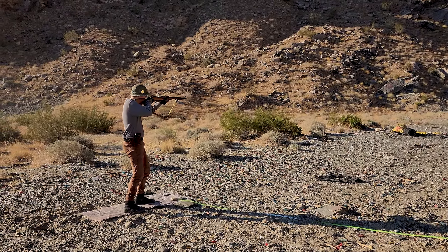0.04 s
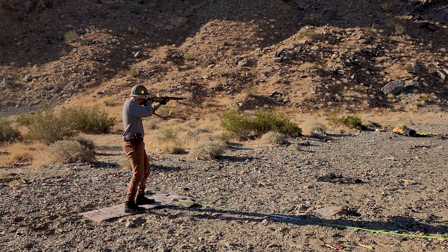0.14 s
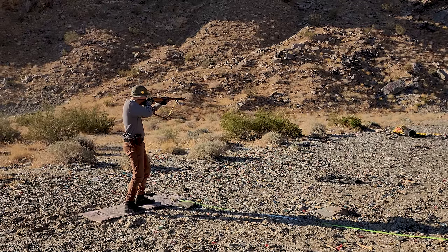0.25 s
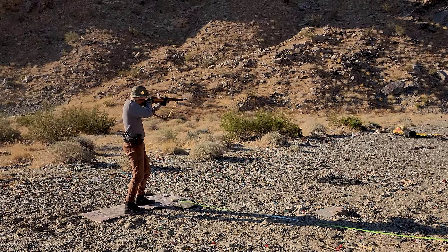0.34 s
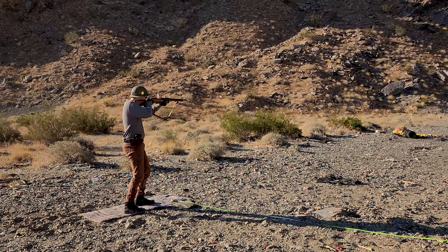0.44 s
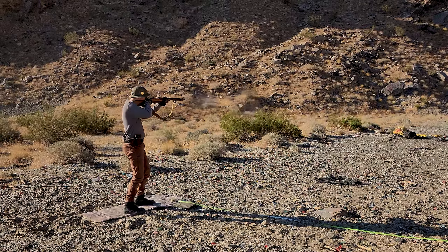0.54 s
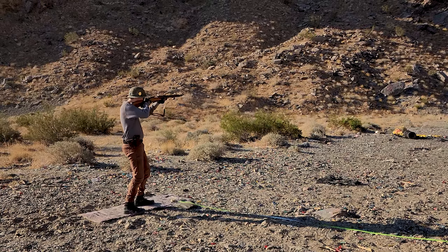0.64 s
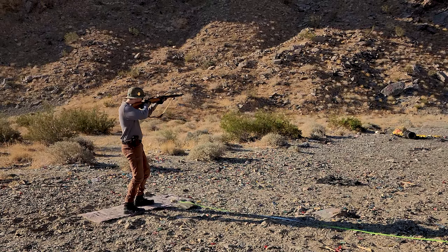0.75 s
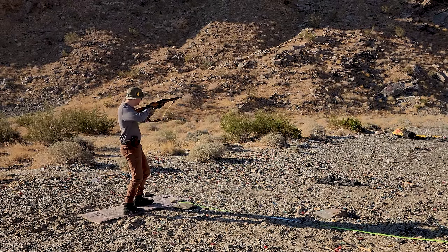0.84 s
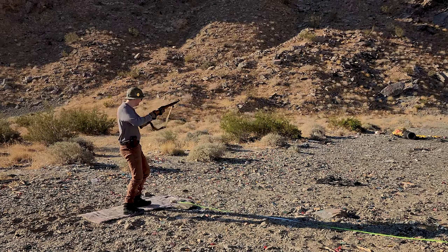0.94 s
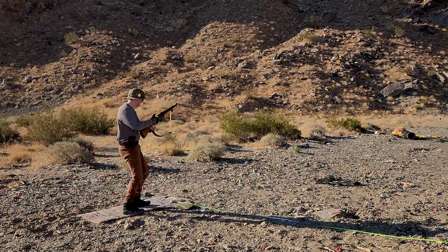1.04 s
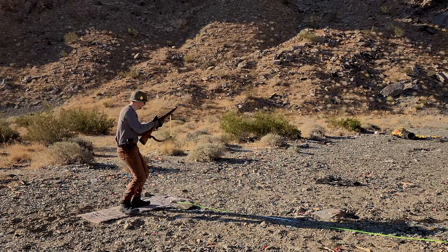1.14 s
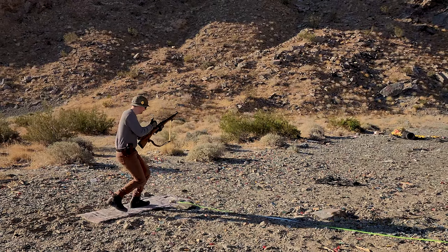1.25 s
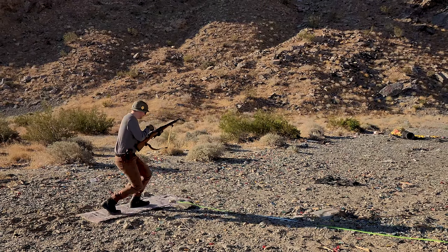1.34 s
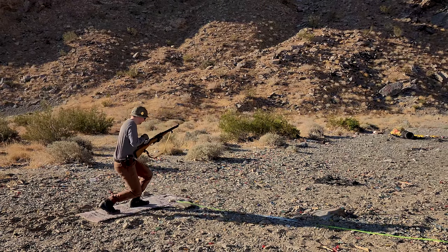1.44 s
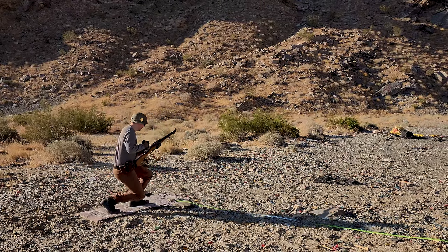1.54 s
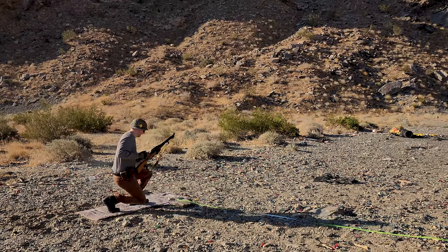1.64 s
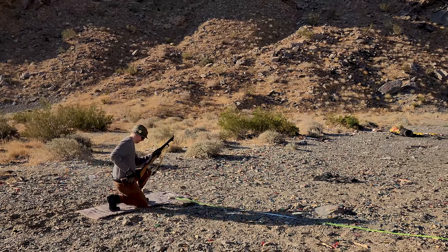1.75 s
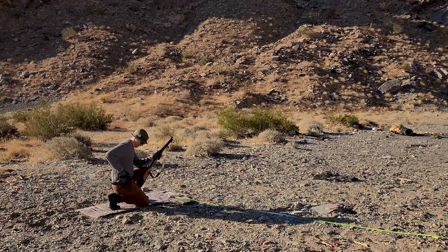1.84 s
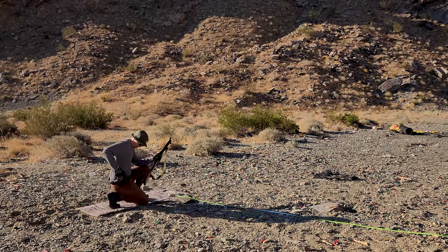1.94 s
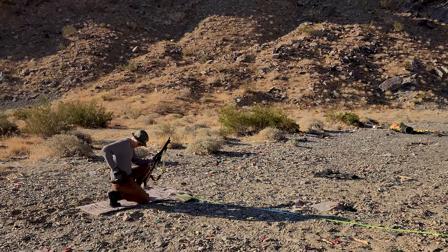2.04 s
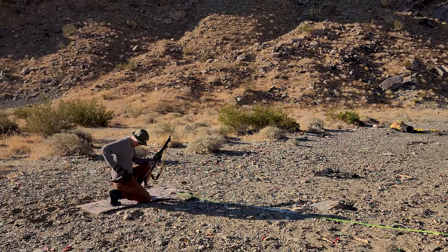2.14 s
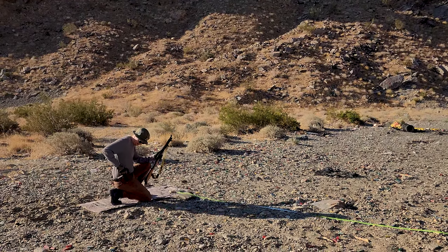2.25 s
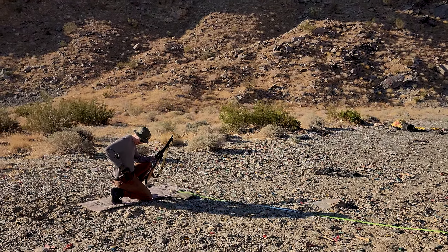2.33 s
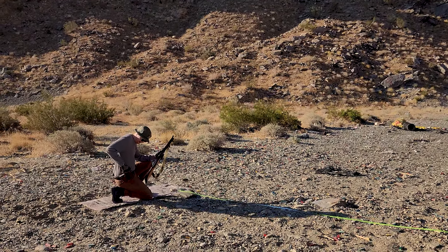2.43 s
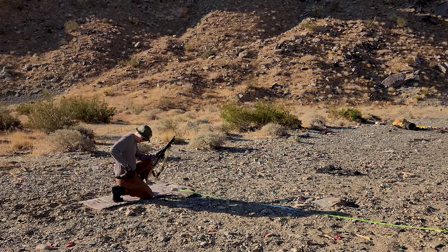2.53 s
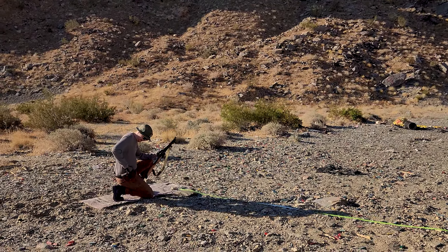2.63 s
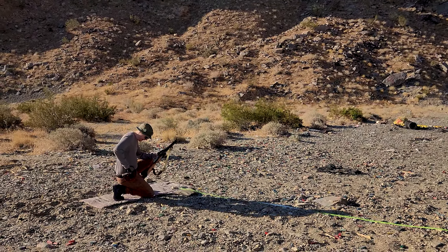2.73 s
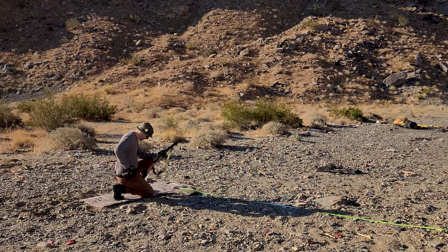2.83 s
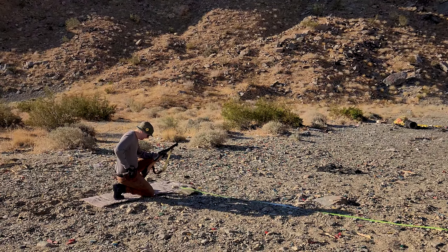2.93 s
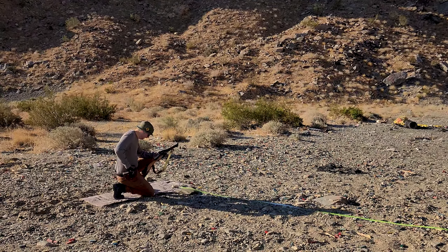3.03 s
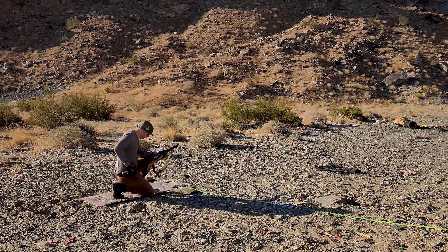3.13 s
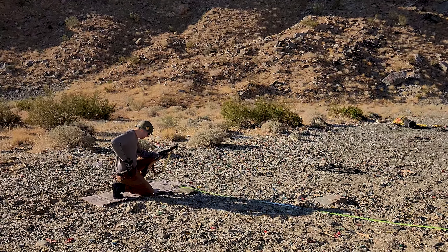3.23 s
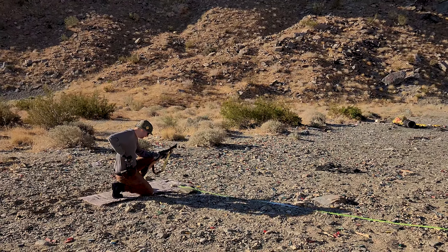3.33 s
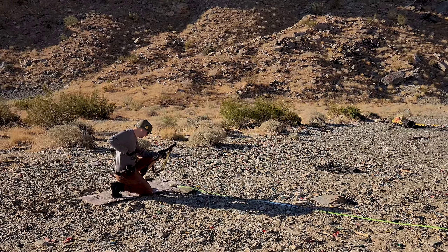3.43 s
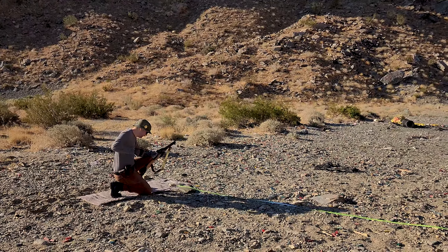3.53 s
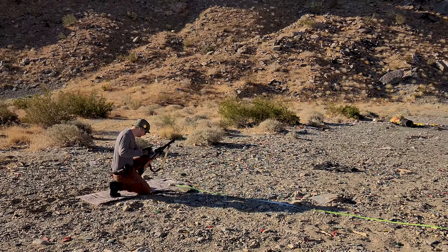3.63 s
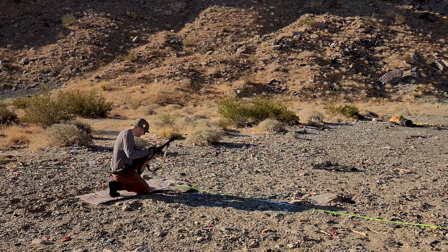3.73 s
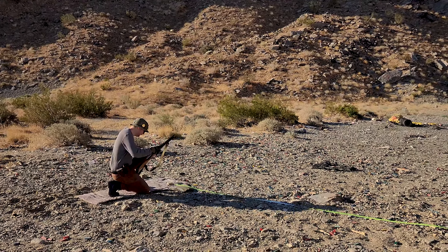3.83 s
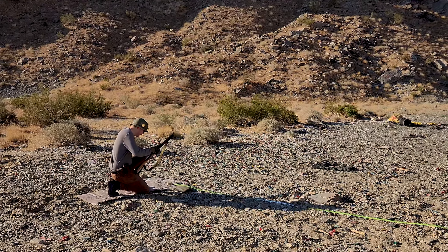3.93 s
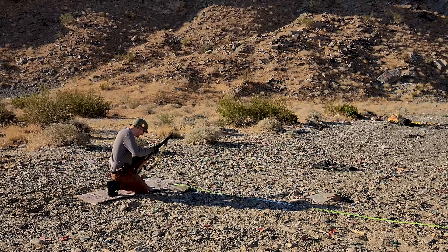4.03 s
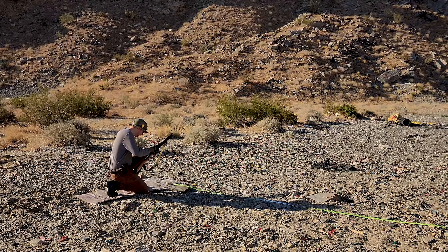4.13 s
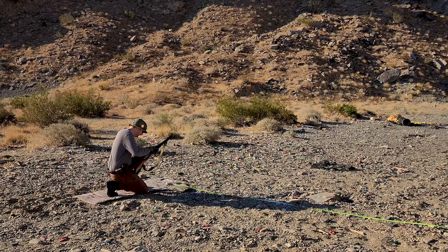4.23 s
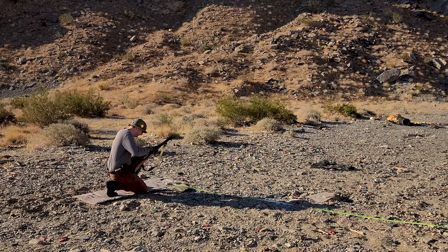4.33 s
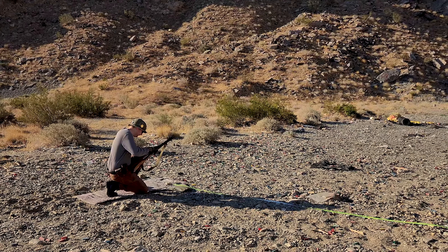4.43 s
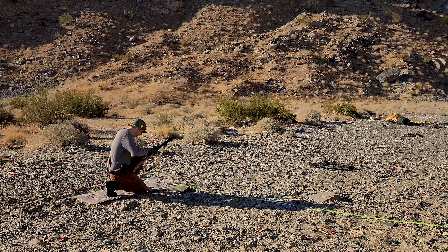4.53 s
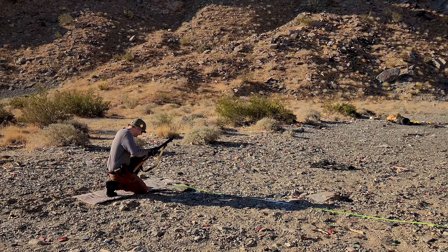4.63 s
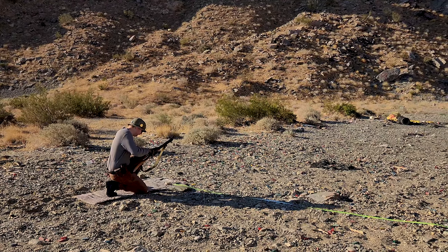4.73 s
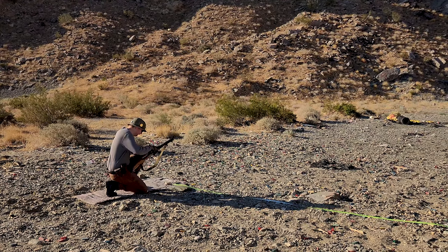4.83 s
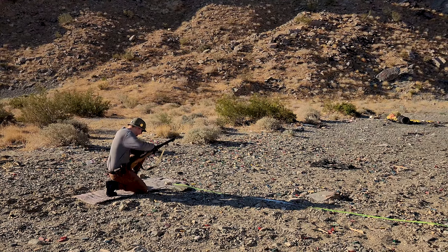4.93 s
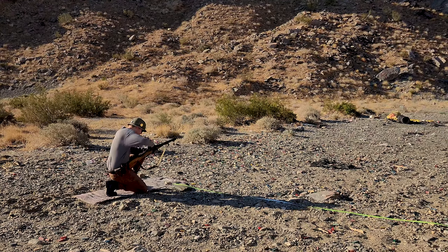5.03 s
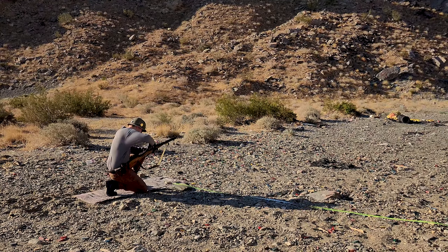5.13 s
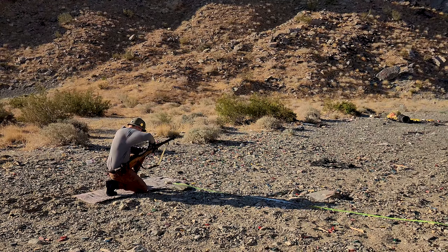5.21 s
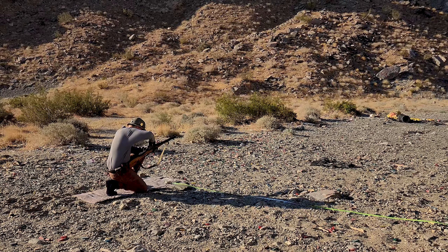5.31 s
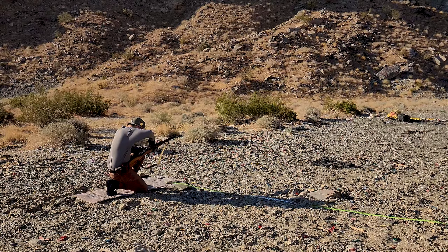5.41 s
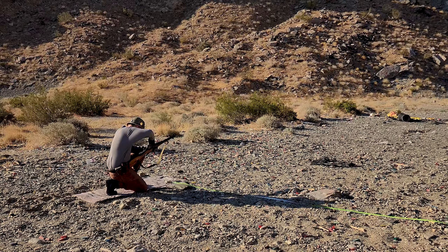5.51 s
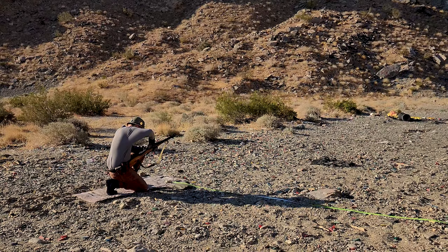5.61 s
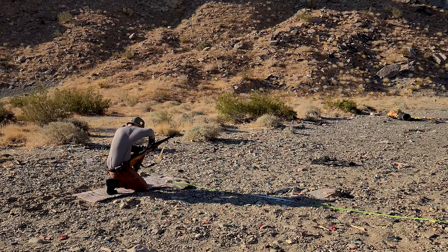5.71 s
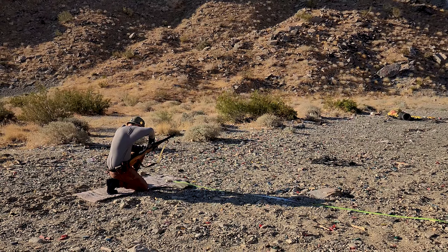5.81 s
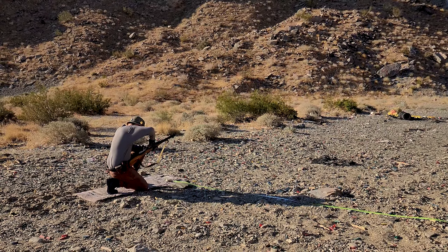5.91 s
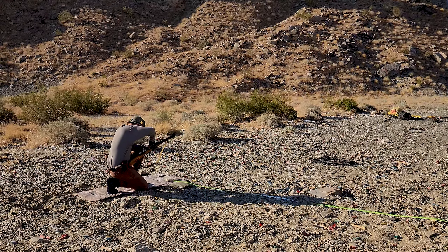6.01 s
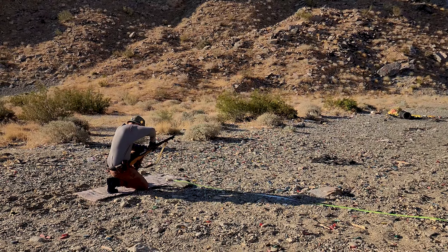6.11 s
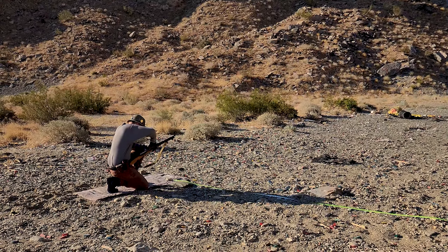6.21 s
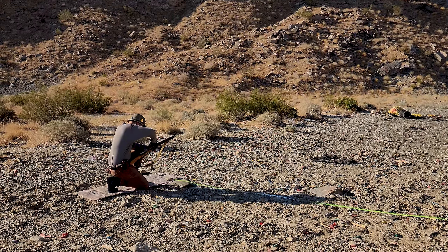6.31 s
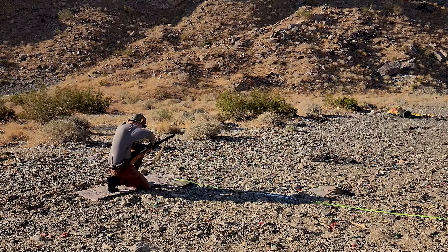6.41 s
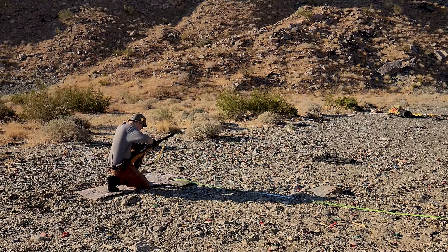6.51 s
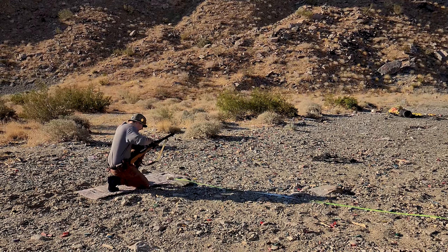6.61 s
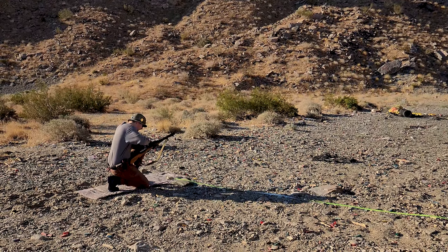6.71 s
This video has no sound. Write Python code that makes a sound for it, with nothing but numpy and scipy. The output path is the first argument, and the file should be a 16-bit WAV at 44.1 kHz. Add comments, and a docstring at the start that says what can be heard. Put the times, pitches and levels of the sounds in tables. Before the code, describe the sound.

A single loud rifle shot cracks in a desert valley, a steel plate clangs, echoes roll off hillsides, then small metallic clicks of reloading.

```python
"""One rifle shot close to a stereo microphone in a desert valley: shaped noise bursts make blast, crack and boom.
A steel plate rings downrange in beating pairs of sines, and the hillsides roll the blast back as dulling noise.
The empty case lands with clicks and tinkles on the gravel in brass sines; the shooter kneels and reloads with
small clicks and a clatter, in short bursts of noise.
Light wind rumbles on the microphone over the hush of the valley, also noise."""
import sys
import numpy as np
from scipy import signal
from scipy.fft import rfft, irfft
from scipy.io import wavfile
from scipy.ndimage import uniform_filter1d

SR = 44100
rng = np.random.default_rng(int(sys.argv[2]) if len(sys.argv) > 2 else 0)


def wav_out(sig):
    """Save sig, one row per channel (or a flat mono array), as 16-bit PCM at SR to the path in sys.argv[1]."""
    wavfile.write(sys.argv[1], SR, np.round(np.clip(np.atleast_2d(sig).T, -1, 1) * 32767).astype(np.int16))


N = 298116
T = np.arange(N) / SR
HZ = np.fft.rfftfreq(N, 1 / SR)
EDGE_HZ = 16200  # upper band limit of the recorder

# All TONE tables are noise spectra. Each row: frequency in Hz, relative level in dB per Hz.
# Breeze at the microphone. Each row: time in seconds, rumble level in dB before buffeting.
BREEZE = [(0, -41), (.45, -46), (.85, -42.5), (1.55, -39.5), (1.9, -44), (2.6, -43), (3.0, -40),
          (4.22, -41.5), (4.55, -44), (4.97, -40), (5.4, -48.5), (5.85, -40), (6.76, -39)]
# Gusts on top of it. Each row: middle in seconds, length in seconds, rumble in dB, flutter in dB before trim.
GUSTS = [(.05, .17, -35, -36.5), (.28, .07, -38, -46), (.99, .08, -39, -41), (1.235, .11, -28.5, -36),
         (1.37, .11, -27, -35), (3.81, .05, -35, -50), (4.02, .04, -34, -43), (5.7, .15, -46, -46.5)]
# Low wind rumble, then the higher flutter: spectra.
RUMBLE_TONE = [(15, -36), (25, -14), (48, -4), (75, -2), (100, 1), (125, -3), (165, -6), (230, -19),
               (400, -42), (800, -90)]
FLUTTER_TONE = [(100, -20), (180, 0), (270, -3), (360, -11), (500, -22), (1500, -55), (4000, -90)]
# Flutter in dB (before trim) at the usual breeze in dB, and dB gained per dB of breeze.
FLUTTER_DB, USUAL_BREEZE_DB, FLUTTER_GROWTH = -51.3, -41, 1.7
# Distant air of the valley. Each row: time in seconds, level in dB. Then its spectrum.
AIR = [(0, -58), (4.6, -60), (5.1, -60), (5.4, -57), (5.8, -60), (6.76, -61.5)]
AIR_TONE = [(200, 0), (500, 0), (900, 0), (1400, -2), (2000, -10), (2550, -24), (3500, -38), (5800, -35),
            (9000, -47), (16000, -58)]

# Roll from the hillsides: its spectrum before the air dulls it.
ROLL_TONE = [(120, -30), (260, -3), (400, -3), (520, -7), (620, -5), (658, 3), (700, -4), (820, -3),
             (1030, -9), (1300, -5.5), (2200, -6), (3200, -13), (6400, -30), (9000, -43), (14000, -65)]
# First arrival in seconds, jump in dB, loudest moment in seconds, level there in dB before air loss.
ROLL_ARRIVES_S, ROLL_JUMP_DB, ROLL_PEAK_S, ROLL_DB = .98, 9, 1.24, -34.6
ROLL_RISE_DB_PER_S, ROLL_FALL_DB_PER_S = 19, 8.8
# Low echoes from the far slopes. Each row: middle in seconds, length in seconds, level in dB. Then their spectrum.
FAR_ECHOES = [(2.05, .8, -43.5), (3.05, .55, -43)]
FAR_TONE = [(100, -25), (190, -4), (280, 0), (370, -6), (500, -20), (1500, -60), (4000, -90)]

# Sounds from the firing point. Each row: frequency in Hz, left-right likeness from 0 to 1.
NEAR_SAME = [(200, .9), (700, .5), (1500, .1), (16000, 0)]
# Their balance. Each row: frequency in Hz, left minus right in dB.
NEAR_PAN = [(200, 0), (700, 5), (2400, 4), (4200, -2), (5400, 0), (6600, -7), (8500, -4), (11800, -7),
            (15000, -4)]

# The shooter moving on gravel and in cloth.
# Each row: middle in seconds, length in seconds, level in dB before the grain lowers it. Then the spectrum.
MOVES = [(1.83, .1, -70), (2.0, .22, -67.5), (3.38, .18, -70), (3.74, .14, -75), (5.3, .14, -76),
         (6.15, .2, -78)]
RUSTLE_TONE = [(1000, -20), (3100, -1), (4000, -7), (5400, -6), (6300, 1), (7500, 0), (9500, -14),
               (11800, -10), (13000, -20), (16000, -24)]
# Brass case bouncing. Each row: start in seconds, level in dB.
BOUNCES = [(1.511, -38), (1.538, -32), (1.992, -60), (2.009, -57), (2.052, -58), (2.131, -63)]
# Modes of the empty case. Each row: frequency in Hz, relative level in dB, 60 dB decay in seconds.
CASE = [(9850, -6, .16), (13480, -2, .08), (13690, 0, .11)]
# Cartridges knocking together. Each row: start in seconds, level in dB.
CLINKS = [(3.293, -55), (3.333, -51), (3.351, -56), (3.397, -55), (4.142, -53)]
# Modes of a cartridge. Each row: frequency in Hz, relative level in dB, 60 dB decay in seconds.
CARTRIDGE = [(3050, -3, .07), (3240, 0, .08), (6200, -6, .05)]
# Single clicks: the case landing, and parts of the rifle and gear.
# Each row: contact in seconds, level in dB before the shared trim, top octave against the whole in dB.
CLICKS = [(1.3743, -23, -15), (1.509, -22, -3), (1.7854, -48, -27), (2.7516, -47, -31), (3.1068, -53, -29),
          (3.2909, -42, -12), (3.3962, -47, -12), (3.7848, -56, -27), (4.1405, -35, -18), (4.367, -42, -38),
          (4.4223, -46, -34), (4.4842, -42, -23), (4.6314, -46, -17), (4.6907, -47, -21),
          (5.3348, -48, -19), (5.3946, -58, -19), (5.6406, -40, -13), (5.881, -50, -18), (5.9904, -25, -16),
          (5.9973, -18, -12)]
# Clicks with weakening repeats, some almost single, one the case landing.
# Each row: first click in seconds, level in dB before the trim, top octave against the whole in dB,
# fall per repeat in dB.
REPEATED_CLICKS = [(1.5369, -13, -10, 14), (3.3318, -38.5, -13, 9), (5.1517, -43, -16, 4.5),
                   (5.235, -40, -15, 4), (6.0077, -16, -12, 4), (6.0921, -14, -16, 7),
                   (6.5435, -25, -16, 15)]
CLICK_TONE = [(500, -40), (900, -15), (1250, -9), (1800, -14), (2500, -6), (3150, -7), (3900, -13),
              (5400, -7), (6300, 1), (7400, -1), (9500, -11), (11800, -3.5), (13000, -11), (15500, -11)]  # shared spectrum of all clicks
REPEAT_GAP_S, CLICK_T60_S = .0115, .037  # mean gap between repeats; 60 dB decay of a loud click

# Bullet hitting the plate. The row: peak in seconds, level in dB, rise in seconds, 60 dB decay in seconds.
SPLASH = (.787, -12, .0012, .025)
SPLASH_TONE = [(400, -35), (650, -13), (1000, -6), (1900, -7), (2700, -10), (3300, -2), (3700, -10),
               (4250, 1), (5200, -11), (6800, -10), (9800, -16), (11800, -7), (16000, -15)]
# Plate modes. Each row: frequency in Hz, level in dB before shimmer and swing, 60 dB decay in seconds,
# left minus right in dB, distance up to a twin mode in Hz, relative size of the twin.
PLATE = [(651.0, -34, 1.2, 0.0, 11.5, 0.1), (962.0, -45.0, 1.2, 5.0, 10.0, 0.2),
         (1098.0, -37.0, 0.67, 4.0, 11.5, 0.1), (1507.0, -35.0, 0.63, 6.0, 12.5, 0.1),
         (1911.0, -33.0, 0.36, 9.0, 11.5, 0.1), (2148.0, -32.0, 0.62, 10.0, 10.5, 0.6),
         (2858.0, -40.0, 0.74, 8.0, 9.5, 0.3), (2961.0, -34.0, 0.52, 9.0, 9.0, 0.1),
         (3165.0, -21.0, 0.32, 7.0, 11.5, 0.1), (3284.0, -43.0, 0.8, 0.0, 15.5, 0.1),
         (3758.0, -32.0, 0.28, 1.0, 13.5, 0.1), (3876.0, -33.0, 0.29, 0.0, 7.0, 0.6),
         (4107.0, -22, 0.33, -4.0, 4.0, 0.1), (4253.0, -22.0, 0.39, -9.0, 9.0, 0.45),
         (4732.0, -34.0, 0.38, -9.0, 4.0, 0.6), (4861.0, -26.0, 0.28, -14.0, 10.0, 0.45),
         (5286.0, -40.0, 0.8, -16.0, 8.5, 0.45), (5965.0, -21.0, 0.24, -13.0, 15.5, 0.1),
         (6202.0, -28.0, 0.4, 12.0, 13.5, 0.6), (6412.0, -36.0, 0.72, -6.0, 8.0, 0.3),
         (6761.0, -15.5, 0.43, -10.0, 10.5, 0.45), (7111.0, -36.0, 0.44, 0.0, 9.0, 0.1),
         (7477.0, -25.0, 0.37, -13.0, 8.5, 0.1), (7870.0, -22.0, 0.33, -9.0, 12.5, 0.3),
         (8263.0, -22.0, 0.39, -7.0, 11.5, 0.1), (10261.0, -38.0, 0.33, -20, 13.5, 0.1),
         (10492.0, -31.0, 0.58, -11.0, 4.0, 0.1), (11036.0, -34.0, 0.43, -13.0, 15.0, 0.3),
         (11612.0, -31.0, 0.42, -13.0, 14.0, 0.1), (12075.0, -34, 0.33, -9.0, 8.0, 0.1)]

# Layers of the report: soft bright lead-in, blast, crack, scatter, boom and a reflection off the nearest rocks.
# Each is one row: peak in seconds, level in dB, rise in seconds, 60 dB decay in seconds.
LEAD_IN = (.614, -26, .009, .05)
BLAST = (.626, -7, .012, .031)
CRACK = (.634, -8.4, .001, .13)
SCATTER = (.66, -21.5, .02, .45)
BOOM = (.629, -21, .008, .23)
ROCKS = (.742, -30, .016, .16)
# Their spectra; the lead-in shares that of the crack.
BLAST_TONE = [(60, -40), (170, -24), (300, 2), (420, -4), (520, -8), (680, 1), (1050, -9), (1400, -3),
              (2100, -7), (3000, -17), (6000, -22), (10000, -25), (14400, -21), (16000, -27)]
CRACK_TONE = [(150, -30), (250, 0), (354, -1), (493, -22), (698, -4), (1040, -20), (1180, -14), (1850, -3),
              (2400, -4), (2620, -2), (2910, -7), (7310, -10), (10700, -15), (14900, -11), (16000, -17)]
SCATTER_TONE = [(240, -47), (400, -17), (562, -4), (607, -15), (676, -3), (1030, -8), (2510, -2),
                (7400, -6), (9760, -12), (11800, -6), (16000, -15)]
BOOM_TONE = [(120, -40), (200, -14), (260, 0), (330, -4), (450, -22), (1000, -60)]
ROCKS_TONE = [(150, -25), (270, 6), (450, -22), (1600, -20), (2000, 0), (2350, 0), (2800, -14), (4400, -10),
              (6000, -22), (16000, -40)]
# Balance of the blast. Each row: frequency in Hz, left minus right in dB.
BLAST_PAN = [(200, 1), (700, 5), (1300, -2), (2500, -2), (3800, 3), (7000, -3), (12000, -8)]


def amp(db):
    """Decibels to gain."""
    return 10 ** (np.asarray(db) / 20)


def read(points, hz=HZ):
    """A spectrum table on a log-frequency axis."""
    f, value = np.transpose(points)
    return np.interp(np.log(hz + 1), np.log(f + 1), value)


def curve(rows, axis=1):
    """One column of a time table at every sample."""
    rows = np.array(rows)
    return np.interp(T, rows[:, 0], rows[:, axis])


def sides(pan_db):
    """Left and right gains of constant power."""
    pan_db = np.atleast_1d(pan_db)
    gains = amp(np.array([pan_db, -pan_db]) / 2)
    return gains / np.sqrt((gains ** 2).mean(0))


def noise(tone, same, pan, size=N):
    """Stereo noise whose mid signal has unit level, with a spectrum, a left-right likeness and a balance."""
    hz = np.fft.rfftfreq(size, 1 / SR)
    left, other = rfft(rng.standard_normal((2, size)))
    likeness = np.clip(read(same, hz), -1, 1)
    right = likeness * left + np.sqrt(1 - likeness ** 2) * other
    spectrum = np.array([left, right]) * amp(read(tone, hz)) * sides(read(pan, hz))
    x = irfft(spectrum, size)
    return x / x.mean(0).std()


def add(mix, s, sound):
    """Mixes a sound in at its time."""
    part = mix[:, round(s * SR):][:, :sound.shape[1]]
    part += sound[:, :part.shape[1]]


def burst(row, tone, pan=NEAR_PAN, grain_db=1.5, size=32768):
    """A grainy puff of pressure that swells to its peak and dies away: (start s, sound)."""
    s, db, rise, t60 = row
    lead = 4 * rise
    t = np.arange(size) / SR - lead
    swell = np.exp(2 * np.minimum(t, 0) / rise)
    decay = np.exp(-np.log(1000) * np.maximum(t, 0) / t60)
    shape = np.where(t < 0, swell, decay)
    grains = uniform_filter1d(rng.standard_normal(size), size=60)
    grains = amp(grain_db * grains / grains.std())
    grains = grains / np.sqrt(np.mean(grains ** 2))
    return s - lead, amp(db) * shape * grains * noise(tone, NEAR_SAME, pan, size)


def ground(x, db, t60):
    """Stones and bushes scatter a short, thin tail: sparse random echoes."""
    t = np.arange(SR // 2) / SR
    sparse = rng.random((2, len(t))) < .1
    taps = rng.standard_normal((2, len(t))) * sparse * np.exp(-np.log(1000) * t / t60)
    tail = signal.fftconvolve(x, taps / np.linalg.norm(taps[0]), axes=1)[:, :N]
    return x + amp(db) * tail


def swells(rows, axis=2, edge=2):
    """Summed power of smooth swells around their middles; a higher edge squares them off."""
    return sum(amp(row[axis]) ** 2 * np.exp(-abs(2 * (T - row[0]) / row[1]) ** edge) for row in rows)


def waver(per_s):
    """Slow random drift between knots of unit size."""
    knots = rng.standard_normal(1024)
    return np.interp(T * per_s, np.arange(len(knots)), knots)


def wind(flutter_trim_db=-.5, buffet_db=1.4, buffets_per_s=12, flutter_buffet_db=1.8):
    """Breeze and gusts rumble and flutter at the microphone over the hush of the valley."""
    same = [(60, .78), (250, .6), (700, .5), (3000, .2)]
    pan = [(100, 0), (700, -1), (1500, -3)]
    breeze_db, buffets = curve(BREEZE), waver(buffets_per_s)
    low = np.sqrt(amp(breeze_db) ** 2 + swells(GUSTS, edge=4))
    # the flutter grows faster than the rumble
    breeze_flutter_db = FLUTTER_DB + FLUTTER_GROWTH * (breeze_db - USUAL_BREEZE_DB)
    high = np.sqrt(amp(breeze_flutter_db) ** 2 + swells(GUSTS, axis=3, edge=4))
    rumble = noise(RUMBLE_TONE, same, pan) * low * amp(buffet_db * buffets)
    flutter = noise(FLUTTER_TONE, same, pan) * high * amp(flutter_trim_db + flutter_buffet_db * buffets)
    air = noise(AIR_TONE, same, pan) * amp(curve(AIR))
    return rumble + flutter + air


def roll_level():
    """The roll jumps in when the slopes answer, builds to its peak and fades evenly in dB."""
    arrived = np.clip((T - ROLL_ARRIVES_S) / .05 + .5, 0, 1)
    rising_db = ROLL_RISE_DB_PER_S * (T - ROLL_PEAK_S)
    falling_db = ROLL_FALL_DB_PER_S * (ROLL_PEAK_S - T)
    db = ROLL_DB + np.minimum(rising_db, falling_db)
    after_blast = np.clip((T - BLAST[0]) / .2, 0, 1)
    return amp(db - ROLL_JUMP_DB * (1 - arrived)) * after_blast


def hills(dulling_db=4.5, steepness=1.31, patchy_db=1.9, swell_db=.7):
    """Countless reflections off the slopes; the longer their path, the more treble the air takes."""
    same = [(200, .7), (600, .5), (1500, -.1), (8000, 0)]
    pan = [(600, 0), (2000, 4), (4000, 3), (7000, -4)]
    hz, t, z = signal.stft(noise(ROLL_TONE, same, pan), SR, nperseg=512)
    patches = rng.standard_normal(z.shape[1:])
    patches = uniform_filter1d(uniform_filter1d(patches, 5, 1), 12, 0)
    swell = uniform_filter1d(rng.standard_normal(len(t)), size=9)
    # air loss steepens with frequency and grows with the log of time
    loss_db = dulling_db * (hz[:, None] / 1000) ** steepness * np.log(np.maximum(t, 1.12) / 1.15)
    uneven_db = patchy_db * patches / patches.std() + swell_db * swell / swell.std()
    roll = signal.istft(z * amp(uneven_db - loss_db), SR, nperseg=512)[1][:, :N]
    far = noise(FAR_TONE, same, pan) * np.sqrt(swells(FAR_ECHOES))
    return roll * roll_level() + far


def rustle(grain_db=5.):
    """Faint crunches of gravel and cloth as the shooter kneels and reaches: grainy noise in swells."""
    grains = uniform_filter1d(rng.standard_normal(N), size=300)
    grains = amp(grain_db * (grains / grains.std() - 1))
    return noise(RUSTLE_TONE, NEAR_SAME, NEAR_PAN) * np.sqrt(swells(MOVES)) * grains


def pings(hits, modes):
    """A small brass body rings at each knock, as decaying sines."""
    out, t = np.zeros((2, N)), np.arange(SR // 2) / SR
    for s, db in hits:
        for hz, mode_db, t60 in modes:
            wave = np.sin(2 * np.pi * (hz * t + rng.random((2, 1))))
            add(out, s, sides(read(NEAR_PAN, hz)) * amp(db + mode_db - 60 * t / t60) * wave)
    return out


def case():
    """The empty case pings at each bounce; fresh cartridges clink in the hand."""
    return pings(BOUNCES, CASE) + pings(CLINKS, CARTRIDGE)


def contacts(count=4, jitter=.12):
    """Every short hard contact: the single clicks, and the clicks with weakening repeats."""
    rows = list(CLICKS)
    for s, db, top_db, fall_db in REPEATED_CLICKS:
        gaps = REPEAT_GAP_S * (1 + jitter * rng.standard_normal(count))
        rows += [(s + gaps[:k].sum(), db - k * fall_db, top_db) for k in range(count)]
    return rows


def clicks(trim_db=-7.4, rise=.0035, lag=.0015, uneven_db=1., ripple_db=2.5, drag=1.8):
    """The case lands, parts of the rifle and gear click; quiet clicks last longer, each has its own tone."""
    out = np.zeros((2, N))
    hz = np.geomspace(400, 16000, 90)
    for s, db, top_db in contacts():
        broad, fine = rng.standard_normal((2, len(hz)))
        broad = uniform_filter1d(broad, size=9)
        tone_db = read(CLICK_TONE, hz) + uneven_db * broad / broad.std() + ripple_db * fine
        treble_db = np.clip(.8 * (top_db + 13.5), -12, 6)
        tone_db += np.interp(hz, [7000, 9500], [0, treble_db])
        t60 = CLICK_T60_S * np.interp(db, [-46, -30], [drag, 1])
        row = (s + lag, db + trim_db, rise, t60)
        add(out, *burst(row, np.transpose([hz, tone_db]), grain_db=3., size=8192))
    return ground(out, db=-26, t60=.24)


def plate(fine_db=-42., fine_t60=.37, shimmer_db=.8, count=90):
    """The bullet splashes on the steel; close pairs of modes beat, over a haze of weak high ones."""
    out, t = np.zeros((2, N)), np.arange(2 * SR) / SR
    ring = np.zeros((2, len(t)))
    for hz, db, t60, pan_db, split, twin in PLATE:
        # the channels differ in phase, up to a quarter turn in the treble
        phase = rng.uniform(0, 2 * np.pi) + np.array([[0], [min(hz / 1400, np.pi / 2)]])
        beating = 1 + twin * np.exp(2j * np.pi * split * t)
        pair = np.exp(1j * (2 * np.pi * hz * t + phase)) * beating
        shimmer = np.interp(t, np.linspace(0, 2, 200), rng.standard_normal(200))
        ring += sides(pan_db) * amp(db + shimmer_db * shimmer - 60 * t / t60) * pair.real
    for place, pan, turn in rng.random((count, 3)):
        hz = 3500 + 11000 * place
        level = amp(fine_db - 4 * place - 60 * t / fine_t60)
        ring += sides(20 * pan - 13) * level * np.sin(2 * np.pi * (hz * t + turn))
    swing_db = np.interp(t, [0, .05, .095, .14, .3], [-3, -.5, 3.5, -3, -2.5])  # swells once, then sinks
    add(out, SPLASH[0], ring * amp(swing_db))
    add(out, *burst(SPLASH, SPLASH_TONE))
    return ground(out, db=-20, t60=.6)


def rifle():
    """A soft bright lead-in, the dull muzzle blast, the bright crack, gravel scatter, a low boom, a rock echo."""
    out = np.zeros((2, N))
    add(out, *burst(LEAD_IN, CRACK_TONE, BLAST_PAN))
    add(out, *burst(BLAST, BLAST_TONE, BLAST_PAN))
    add(out, *burst(CRACK, CRACK_TONE))
    add(out, *burst(SCATTER, SCATTER_TONE, grain_db=2.))
    add(out, *burst(BOOM, BOOM_TONE))
    add(out, *burst(ROCKS, ROCKS_TONE))
    # quick onset; later the near slope runs out of reflectors
    return out * amp(np.interp(T, [.58, .605, .78, .84], [-50, 0, 0, -12]))


def scene():
    """Everything that reaches the microphone, from the background to the shot."""
    return wind() + hills() + rustle() + case() + clicks() + plate() + rifle()


def record(dry):
    """The loudest peaks overload and clip; short fades at both ends, then the band limit."""
    fades = np.minimum(np.minimum(T, T[::-1]) / .005, 1)
    clipped = np.clip(dry, -1, 1) * fades
    lowpass = signal.firwin(401, EDGE_HZ, window=("kaiser", 8), fs=SR)
    return signal.oaconvolve(clipped, lowpass[None], "same")


dry = scene()
out = record(dry)
wav_out(out)
```